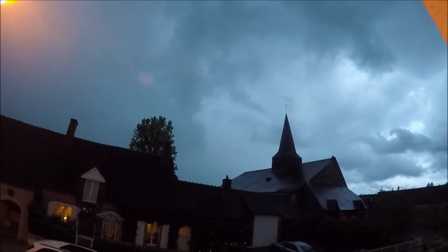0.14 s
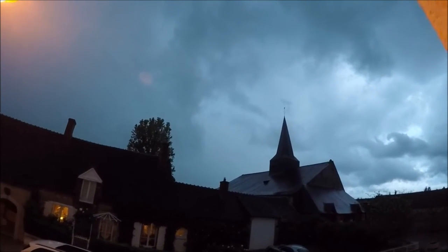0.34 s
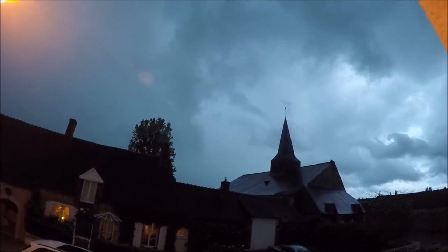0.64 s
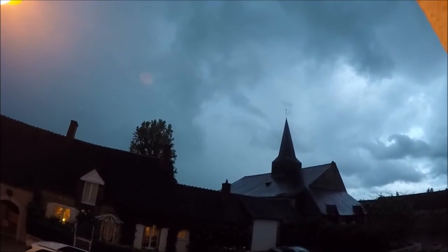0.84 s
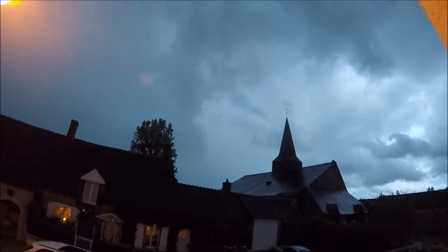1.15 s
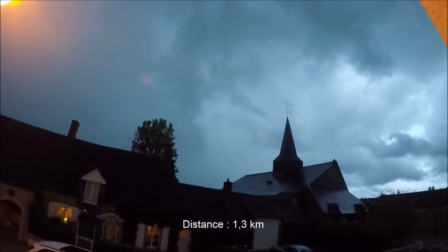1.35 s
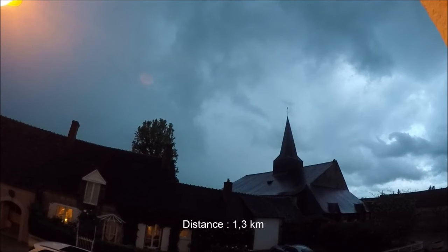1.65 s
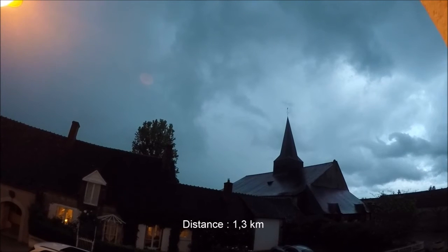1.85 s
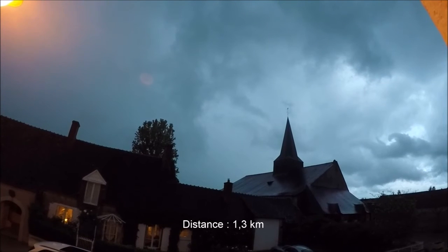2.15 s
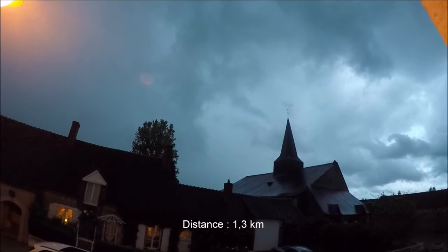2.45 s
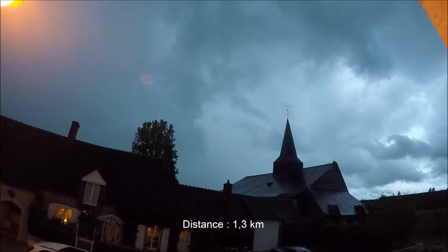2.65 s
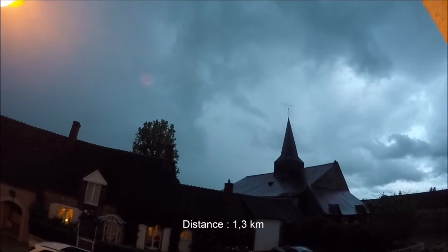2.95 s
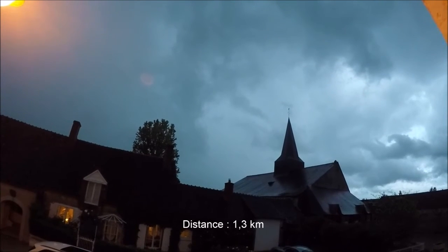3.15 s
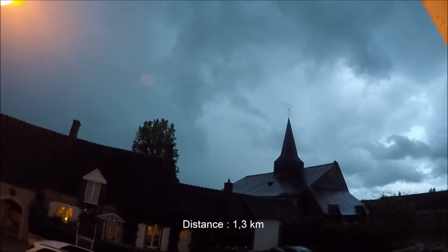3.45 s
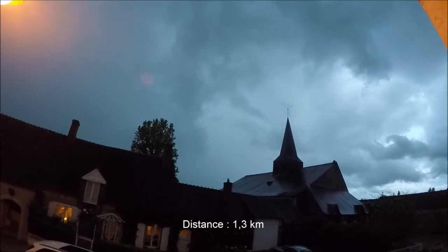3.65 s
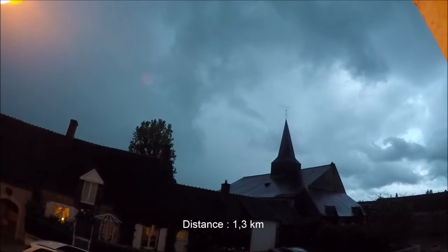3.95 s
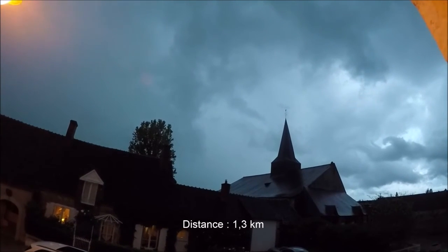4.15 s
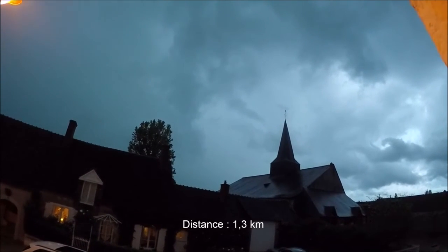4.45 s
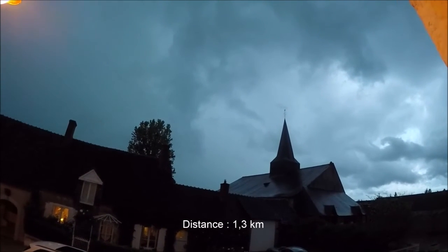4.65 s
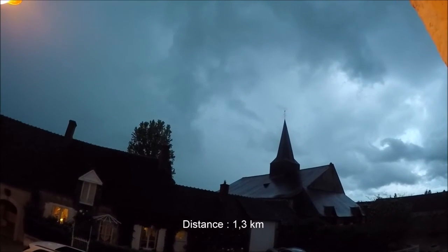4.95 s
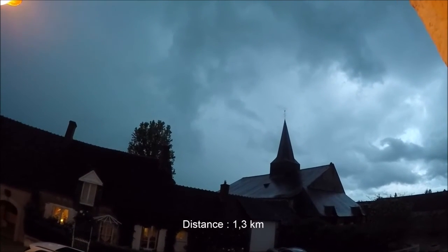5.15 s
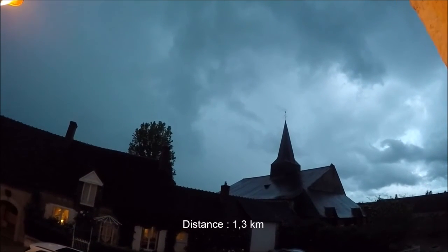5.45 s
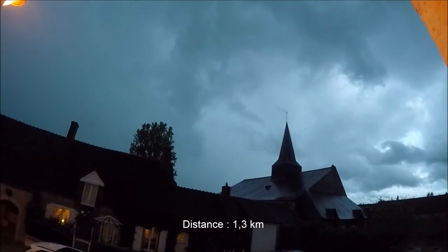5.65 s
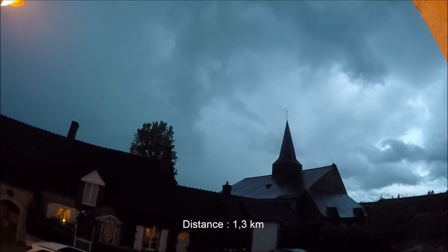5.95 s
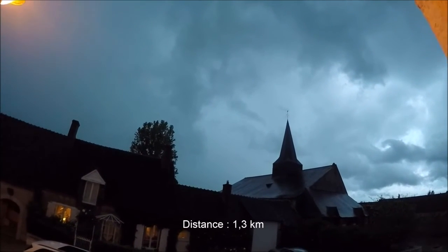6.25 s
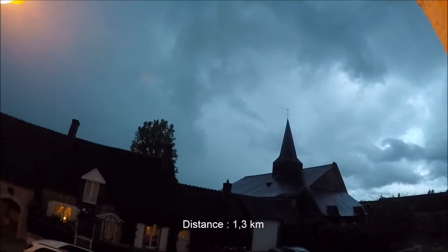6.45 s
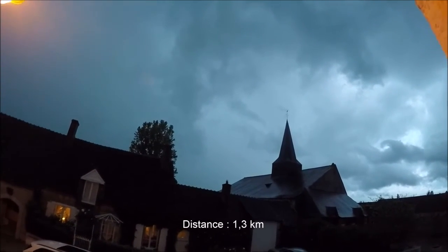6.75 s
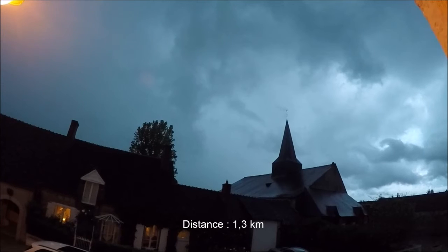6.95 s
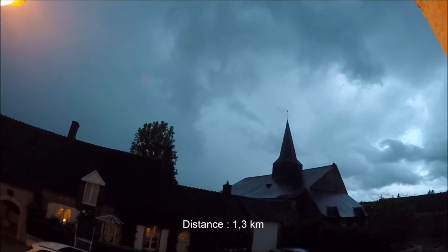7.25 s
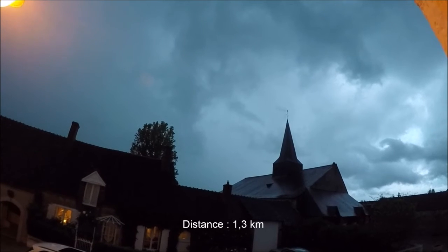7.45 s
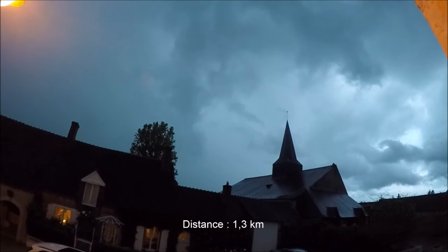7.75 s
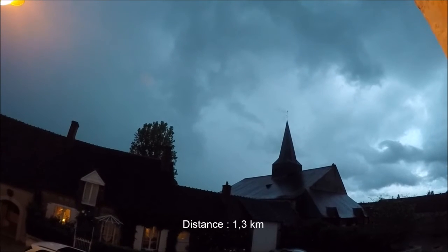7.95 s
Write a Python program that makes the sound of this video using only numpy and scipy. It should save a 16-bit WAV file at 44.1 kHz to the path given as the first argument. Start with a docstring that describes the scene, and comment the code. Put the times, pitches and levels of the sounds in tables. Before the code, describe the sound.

A long, growing roll of close thunder, knocking and rumbling off house walls, peaks late in heavy low booms while a few raindrops tick.

```python
"""Thunder from a long lightning channel rolls over a village square, loudest in its booms and thuds.
The roll is made of thousands of shock fronts at random times, echoed by house walls.
Claps are sudden puffs of noise; thuds are short, low swings of pressure.
First raindrops tick nearby as small puffs of bright noise, with a patter of tiny splashes.
Filtered noise gives the steady hiss of the microphone."""
import sys
import numpy as np
from scipy import signal
from scipy.fft import rfft, irfft, next_fast_len
from scipy.io import wavfile
from scipy.ndimage import uniform_filter1d

SR = 44100
rng = np.random.default_rng(int(sys.argv[2]) if len(sys.argv) > 2 else 0)


def bounce(signal):
    """Save signal as a 16-bit WAV file at the path given by the first command-line argument."""
    frames = np.transpose(np.atleast_2d(signal))
    limited = np.clip(frames, -1, 1)
    pcm = np.round(limited * 32767).astype(np.int16)
    wavfile.write(sys.argv[1], SR, pcm)


def volts_from_decibels(level):
    """Turn decibel levels (scalar or array-like) into linear amplitude factors."""
    exponent = np.asarray(level, float) / 20
    return 10 ** exponent


N = 357210  # length of the scene in samples


def evened(x):
    """Scales a sound to an average strength (rms) of 1."""
    return x / np.sqrt(np.mean(x ** 2) + 1e-20)


def coloured(x, points):
    """Filters a sound by a curve of (f/Hz, level/dB), joined by lines on a log-frequency axis."""
    size = next_fast_len(len(x))
    f, db = np.transpose(points)
    hz = np.fft.rfftfreq(size, 1 / SR)
    gain = volts_from_decibels(np.interp(np.log(hz + 1), np.log(f + 1), db))
    return irfft(rfft(x, size) * gain, size)[:len(x)]


def band(x, low_hz, high_hz, order=3):
    """Lets through only the range from low_hz to high_hz, without looking ahead in time."""
    edges = [low_hz, min(high_hz, SR * .45)]
    return signal.sosfilt(signal.butter(order, edges, "band", fs=SR, output="sos"), x)


def add(mix, s, sound):
    """Mixes a sound in at time s, in seconds."""
    part = mix[round(s * SR):][:len(sound)]
    part += sound[:len(part)]


def burst(db, hz, t60, octaves, rise):
    """A puff of noise around hz that rises fast and dies away, 60 dB in t60 s, scaled to its peak."""
    t = np.arange(SR // 2) / SR
    shape = (1 - np.exp(-t / rise)) * volts_from_decibels(-60 * t / max(t60, .01))
    noise = shape * rng.standard_normal(len(t))
    puff = band(noise, hz / 2 ** octaves, hz * 2 ** octaves, order=4)
    return volts_from_decibels(db) * puff / abs(puff).max()


def walls(x, t60=0.36, wet_db=-3, count=16):
    """Sounds come from one of several directions, each with its own sparse echoes off the houses."""
    way = rng.integers(0, count, N)  # a random direction for every sample
    at = np.arange(200, SR // 2 - 20, 20)
    wet = np.zeros(N)
    for k in range(count):
        echoes = np.zeros(SR // 2)
        sign = rng.choice([-1., 1.], len(at))
        echoes[at + rng.integers(0, 20, len(at))] = sign * volts_from_decibels(-60 * at / SR / t60)
        wet += signal.oaconvolve(x * (way == k), echoes / np.linalg.norm(echoes))[:N]
    return x + volts_from_decibels(wet_db) * wet


def steadied(x, span_s):
    """Divides out level changes slower than about span_s, so that a later curve sets the swell."""
    size = max(round(span_s * SR), 1)
    power = uniform_filter1d(uniform_filter1d(x ** 2, size), size)
    return x / np.sqrt(power + 1e-4)


# Colour after the air and the ground echo, from near stretches of channel:
# (f/Hz, relative level per Hz/dB)
NEAR_COLOUR = [(11, -26.5), (18, -6.5), (53, -2.5), (106, -4), (170, -10.5), (208, -8), (282, -7),
               (315, -4), (426, -16), (475, -8.5), (518, -19), (620, -25.5), (717, -28.5), (782, -31),
               (1500, -39), (1930, -41.5), (2200, -50), (3200, -60.5), (4160, -89), (7040, -120)]
# The same from far stretches: (f/Hz, relative level per Hz/dB)
FAR_COLOUR = [(11, -35.5), (18, -7), (59, 0.5), (151, -5), (185, -9.5), (227, -6), (276, -14), (329, -11),
              (465, -19), (603, -25), (872, -37.5), (1370, -43), (1900, -58), (2260, -71), (3200, -61.5),
              (4160, -75), (7040, -120)]
# How the thunder moves away: (t/s, weight of the far colour from 0 to 1)
MOVING_AWAY = [(3.3, 0.18), (5.0, 0.8)]


def through_air(fronts):
    """Air and ground echo colour the fronts; the mix slides from the near colour to the far one."""
    far = np.clip(np.interp(np.arange(N) / SR, *np.transpose(MOVING_AWAY)), 0, 1)
    near_sound = evened(coloured(fronts, NEAR_COLOUR))
    far_sound = evened(coloured(fronts, FAR_COLOUR))
    return (1 - far) * near_sound + far * far_sound


def bunched(rows, t, hz):
    """Sums smooth humps in dB; each fades with distance in time and in pitch from its centre."""
    reach_octaves = 1.25
    total = 0
    for s, db, mid_hz, length in rows:
        off_pitch = np.log2(hz / mid_hz) / reach_octaves
        off_time = 2 * (t - s) / length
        total = total + db * np.exp(-off_pitch ** 2 - off_time ** 2)
    return total


# Booms and crackles, where fronts of about one pitch grow louder (softer if negative):
# (t/s, level over the roll/dB, centre f/Hz, length t/s)
LOUDER_MOMENTS = [(.735, 5.5, 450, 0.065), (.75, 2, 100, .06), (.91, 8, 1500, 0.25),
                  (0.918, 11.5, 170, 0.089), (1.2, 3.5, 1500, 0.1), (1.225, 4, 1800, 0.027),
                  (1.206, 7.5, 196, 0.084), (1.35, 4, 1500, 0.038), (1.36, 3.5, 250, 0.093),
                  (1.44, 9, 500, 0.022), (1.872, 3.5, 1000, 0.05), (2.24, 5, 1270, 0.087),
                  (2.25, 3, 50, 0.12), (2.37, 7, 700, 0.07), (2.36, 3, 70, .06), (2.495, 10, 576, 0.079),
                  (2.565, 11.5, 65.4, 0.028), (2.735, 2, 91, 0.1), (2.75, 5, 300, 0.039),
                  (2.79, 1.5, 1700, 0.037), (2.82, 6, 1310, 0.32), (2.83, 1, 800, 0.098),
                  (2.96, 1.5, 1500, .06), (3.08, 2, 1400, 0.036), (3.14, 5, 1500, 0.09),
                  (3.206, 10.5, 100, 0.079), (3.32, 8, 55, 0.053), (3.31, 2.5, 1800, .04),
                  (3.344, 4.5, 700, 0.073), (3.43, 3.5, 300, 0.047), (3.695, 15.5, 60, 0.017),
                  (3.876, 5, 1300, 0.054), (4.23, 4, 130, 0.032), (4.245, 5.5, 1500, 0.052),
                  (4.412, 8.5, 55, 0.075), (4.643, 7, 71, 0.24), (5.22, 4, 302, 0.043),
                  (5.37, 1.5, 189, 0.04), (5.5, 4.5, 80, 0.097), (5.52, -0.5, 220, 0.047),
                  (5.43, 3.5, 550, 0.35), (5.56, 1.5, 910, 0.05), (6.052, 11.5, 79.4, 0.054),
                  (6.2, 3.5, 50.6, 0.12), (6.401, 6.5, 298, 0.033), (6.6, -2, 60, 0.054),
                  (6.59, 5, 463, 0.052), (6.775, 5.5, 149, 0.065), (6.65, 1, 160, 0.051),
                  (6.765, 4, 600, 0.1), (6.75, 2.5, 1400, 0.079), (6.86, 2.5, 300, 0.23),
                  (6.58, 0.5, 787, .06), (7.53, -0.5, 800, 0.065), (7.71, 1, 696, 0.068),
                  (5.36, 2, 750, 0.039), (7.045, 4, 130, 0.038), (7.394, 7.5, 151, 0.062),
                  (7.535, 8, 452, 0.095), (7.545, 2, 190, 0.053), (7.7, 3, 250, 0.17), (8.08, 5, 90, 0.066)]


def booms(t, hz):
    """Rise in dB where fronts sounding around hz swell into booms and crackles."""
    return bunched(LOUDER_MOMENTS, t, hz)


# Lulls, where fronts of about one pitch grow softer (louder if negative):
# (t/s, level under the roll/dB, centre f/Hz, length t/s)
SOFTER_MOMENTS = [(.81, 10, 200, 0.037), (1.04, 3, 60, 0.1), (1.038, 3, 330, 0.048), (1.147, 2, 600, .03),
                  (1.1, -2, 1200, .1), (1.29, 5.5, 250, 0.055), (1.29, 4, 1200, .05), (1.67, 9, 151, 0.035),
                  (1.76, 2, 100, 0.024), (2.19, 12, 80, 0.021), (2.32, 34, 90.5, 0.018),
                  (2.6, 0, 506, 0.064), (2.724, 1, 600, .025), (3.063, 2, 60, .05), (3.427, 3, 60, .05),
                  (3.46, 6, 200, 0.068), (3.52, 1.5, 506, 0.083), (3.76, 8, 117, 0.078),
                  (3.941, 2, 150, .035), (3.96, 0.5, 1400, .1), (4.29, 5, 70, .05), (4.49, 8, 55.5, 0.042),
                  (4.535, 7, 55, .04), (4.755, 3, 400, 0.025), (5.07, 13.5, 200, 0.018),
                  (5.98, 3, 70, 0.075), (2.62, 1.5, 1500, .08), (3.03, -1, 1300, 0.035),
                  (3.22, -1, 1500, 0.053), (6.35, 5.5, 250, 0.036), (6.71, -1, 81, 0.021),
                  (6.824, 10, 160, 0.027), (6.87, 5, 50, 0.044), (6.985, 19, 101, 0.018),
                  (7.194, -2.5, 600, .03), (7.298, 1.5, 320, .03), (7.548, 12, 55, 0.05),
                  (7.78, 17, 89, 0.031), (8.03, 6.5, 150, 0.084)]


def lulls(t, hz):
    """Drop in dB for fronts around hz, in the lulls and around each thud of similar pitch."""
    dip_db, dip_span = 3, 0.93  # dip at a thud, and its length as a share of the thud's length
    dips = [(s, dip_db, thud_hz, dip_span * cycles / thud_hz) for s, _, thud_hz, cycles in THUD_LIST]
    return bunched(SOFTER_MOMENTS + dips, t, hz)


# The five sizes of front: (low f/Hz, high f/Hz, arrivals per s, scale of random level/dB)
FRONT_SIZES = [(32.8, 74.5, 470, -0.5), (85.8, 177, 550, 1.5), (197.7, 433, 900, 1.5),
               (412, 799, 1500, 1.5), (790, 2770, 1000, 1.5)]
# The swell of this strike: (t/s, level/dB before each size's offset, brightness/dB, depth/dB)
STRIKE = [(0.704, -46.5, 4, 1), (1.05, -46, -5, -2), (1.3, -42, 2, -0.5), (1.6, -34, -2, -3),
          (2.0, -32, 0.5, -1), (2.4, -32, 5, 2), (2.8, -28.5, -1, 1), (3.05, -29.5, 1.5, 3),
          (3.4, -29.5, -0.5, -3), (3.8, -32, -1.5, 1.4), (4.1, -33, -3, 0.3), (4.6, -32, -3, -1.5),
          (5.05, -32, -3.5, 1), (5.4, -27.5, -6.5, 2.5), (5.75, -29.5, -5, 0), (6.2, -31, -2, 1),
          (6.65, -24, -7.5, 4), (6.95, -27.5, -10, 3.5), (7.281, -31.5, -4, 0.5), (7.6, -25.5, -10.5, -1),
          (7.849, -27, -8, -0.5), (8.1, -28.5, -16.5, 1.5)]
# How each size of front follows the strike:
# (offset level/dB, share of brightness, share of depth, far rumble level at the start/dB)
SIZE_FOLLOWS = [(1, 0.013, 0.87, -45), (1, -0.33, 0.12, -50.5), (-1.5, 0.15, -0.66, -57),
                (-9, 0.16, 0.3, -63.5), (-22.5, 0.69, -0.15, -75)]


def roll():
    """Shock fronts of five sizes arrive at random and follow one swell, over a fading far rumble."""
    rumble_fade_db_per_s = 6
    s, level_db, bright_db, deep_db = np.transpose(STRIKE)
    t, out = np.arange(N) / SR, np.zeros(N)
    steps = t[::64]  # loudness is worked out every 64 samples
    for follow, front in zip(SIZE_FOLLOWS, FRONT_SIZES):
        over_db, bright, deep, rumble_db = follow
        low, high, rate, spread_db = front
        size = volts_from_decibels(spread_db * np.minimum(rng.exponential(1, N), 5)) * rng.choice([-1., 1.], N)
        arrives = rng.random(N) < rate / SR
        fronts = band(walls(size * arrives), low, high)
        heard = steadied(through_air(fronts), span_s=0.055 + 2.0 / low)
        hz = np.sqrt(low * high)
        swell_db = np.interp(steps, s, level_db + over_db + bright * bright_db + deep * deep_db)
        strike = volts_from_decibels(swell_db + booms(steps, hz) - lulls(steps, hz)) * (steps > s[0])
        rumble = volts_from_decibels(rumble_db - rumble_fade_db_per_s * steps)
        out += np.interp(t, steps, np.hypot(strike, rumble)) * heard
    return out


# Colour of the hiss: (f/Hz, relative level per Hz/dB)
HISS_COLOUR = [(410, -31.5), (700, 1.5), (1010, -1), (2020, 1.5), (2220, 1), (3440, -2.5), (3720, -2.5),
               (4940, -3), (8620, -9), (14300, -12), (15400, -19)]


def hiss():
    """Steady self-noise of the microphone: random noise, filtered to its colour."""
    return volts_from_decibels(-67.5) * evened(coloured(rng.standard_normal(N), HISS_COLOUR))


# Raindrops landing close by:
# (t/s, peak level before echoes/dB, centre f/Hz, time to fall 60 dB t/s, reach in octaves)
DROP_LIST = [(.249, -57, 3250, 0.055, 0.31), (0.323, -54.5, 3870, 0.039, .4),
             (.571, -58.5, 5780, 0.086, 0.27), (0.936, -52, 5770, 0.05, 0.23), (.936, -55.5, 3200, .06, .2),
             (.947, -56.5, 5600, .06, .2), (1.944, -58, 2610, 0.043, 0.27), (4.627, -53, 3320, 0.031, 0.5),
             (4.68, -61, 2310, 0.06, 0.19), (4.875, -66, 4600, 0.034, .15), (4.951, -51, 4300, 0.035, 0.5),
             (5.015, -62.5, 4900, .03, 0.17), (5.204, -56, 3410, 0.028, 0.6),
             (5.879, -53.5, 2540, 0.034, 0.36), (6.558, -57, 4540, 0.026, 0.31),
             (6.713, -51.5, 4180, .025, 0.88), (6.714, -55.5, 6540, 0.063, 0.17),
             (6.742, -62, 6420, .05, .1), (6.746, -56, 3700, .07, .5), (6.789, -59.5, 4490, 0.064, 0.084),
             (6.778, -61.5, 6340, 0.037, .15), (6.812, -60.5, 3400, 0.066, 0.57),
             (6.835, -60.5, 3600, 0.052, .6), (7.848, -53.5, 3170, .035, 0.36)]


def drops():
    """Short bright ticks of water on tile and stone, and a thin random patter of one tiny splash."""
    spray_db, spray_s = 2.5, .09  # the patter grows louder after each close drop, then settles
    out = np.zeros(N)
    for s, db, hz, t60, octaves in DROP_LIST:
        add(out, s, burst(db, hz, t60, octaves, rise=0.0011))
    out = walls(out, t60=.2, wet_db=-10.5)
    landed = np.bincount([round(row[0] * SR) for row in DROP_LIST], minlength=N)
    spray = np.minimum(signal.lfilter([1], [1, -np.exp(-1 / (spray_s * SR))], landed), 1)
    size_db = spray_db * spray + 3.0 * np.minimum(rng.exponential(1, N), 3)
    patter = volts_from_decibels(size_db) * (rng.random(N) < 150 / SR)  # about 150 splashes per s
    splash = rng.standard_normal(900) * volts_from_decibels(-60 * np.arange(900) / SR / 0.093)
    splashes = band(signal.oaconvolve(patter, splash)[:N], 2300, 5000, order=3)
    return out + volts_from_decibels(-77.5) * evened(splashes)


# Single claps: (t/s, peak level/dB, centre f/Hz, time to fall 60 dB t/s)
CLAP_LIST = [(.712, -36, 370, 0.079), (.882, -38, 323, 0.079), (1.161, -42.5, 400, 0.33),
             (1.333, -36, 358, 0.098), (1.43, -45, 414, 0.051), (1.59, -40, 327, 0.063),
             (1.85, -37, 413, 0.05), (2.01, -31.5, 486, 0.077), (2.142, -29.5, 397, 0.092),
             (2.47, -29.5, 387, 0.071), (2.55, -31.5, 386, 0.085), (2.823, -17.5, 317, 0.32),
             (3.136, -24, 327, 0.23), (3.28, -36, 350, 0.094), (5.215, -29, 270, .1),
             (5.345, -28, 247, 0.091), (5.55, -33, 533, 0.092), (5.735, -39, 480, .05),
             (6.174, -38, 480, 0.044), (6.27, -35, 395, 0.076), (6.564, -23, 300, 0.12),
             (6.73, -14, 253, 0.14), (6.752, -21.5, 350, 0.25), (7.33, -37, 447, 0.074),
             (7.705, -31, 430, 0.21), (7.95, -37, 454, 0.056)]


def claps():
    """Stretches of channel that face the listener arrive all at once, each as a puff of noise."""
    out = np.zeros(N)
    for s, db, hz, t60 in CLAP_LIST:
        add(out, s, burst(db, hz, t60, octaves=0.76, rise=0.0011))
    return out


# Thuds and knocks, each one big front and its swing back:
# (centre t/s, height of the window as level/dB, f/Hz, cycles)
THUD_LIST = [(.72, -33, 397, 3.5), (.853, -29.5, 139, 2.4), (.938, -35, 95.5, 2.9),
             (1.087, -30.5, 140, 2.4), (1.138, -29.5, 125, 4), (1.181, -28, 110, 2.65),
             (1.21, -30.5, 330, 5), (1.225, -29, 100, 2.55), (1.356, -25, 90, 2.5), (1.431, -28, 338, 5.6),
             (1.517, -32, 480, 6), (1.545, -27, 60, 2.5), (1.6, -21.5, 134, 2.7), (1.718, -18.5, 129, 3.1),
             (1.785, -23, 130, 2.4), (1.811, -18, 124, 2.8), (2.045, -24, 60.4, 3.5),
             (2.155, -21, 337, 5.7), (2.289, -24, 477, 7), (2.754, -16.5, 150, 3.4),
             (2.832, -25.5, 600, 5.9), (2.834, -15.5, 150, 3.1), (2.71, -16, 65, 2.1),
             (2.84, -13, 76.4, 1.9), (2.88, -12, 70, 1.66), (3.188, -20, 101, 2.85), (3.242, -20.5, 300, 5),
             (3.284, -17.5, 70, 2.8), (3.337, -22.5, 486, 8), (3.515, -15.5, 104, 2.8),
             (3.572, -32, 496, 6), (3.602, -13, 62, 2.7), (3.632, -19, 150, 2.85), (4.23, -29, 495, 6.5),
             (4.689, -30, 500, 5.3), (4.838, -16, 58, 2.2), (4.941, -28.5, 500, 6), (5.222, -22.5, 253, 6),
             (5.265, -14.5, 75, 1.8), (5.353, -10, 73, 1.7), (5.372, -12.5, 188, 3),
             (5.413, -13.5, 61.7, 2.9), (5.531, -16, 111, 3.05), (5.587, -19.5, 258, 5.1),
             (6.006, -29.5, 507, 5.6), (6.566, -9.5, 91, 2.53), (6.571, -11.5, 188, 2.76),
             (6.605, -14, 70, 2.4), (6.647, -13.5, 150, 3.5), (6.735, -9, 168, 2.03),
             (6.744, -5.5, 84, 3.64), (6.763, -10.5, 320, 5.2), (6.766, -13, 140, 3.24),
             (6.784, -17, 353, 9.9), (6.855, -14, 110, 2), (6.922, -13, 64.4, 2.6), (7.5, -13, 66, 2.9),
             (7.545, -13.5, 184, 4.3), (7.56, -12, 145, 3.5), (7.609, -11.5, 62.4, 3.55),
             (7.681, -8.5, 105, 2.22), (7.728, -10, 75, 2.45)]


def thuds():
    """A few swings of pressure, as sine cycles under a smooth window centred on their time."""
    out = np.zeros(N)
    for (s, db, hz, cycles), turn in zip(THUD_LIST, rng.random((len(THUD_LIST), 1))):
        t = np.arange(0, cycles / hz, 1 / SR)
        swing = np.sin(2 * np.pi * (hz * t + turn))  # turn: random starting point in the cycle
        add(out, s - t[-1] / 2, volts_from_decibels(db) * np.hanning(len(t)) * swing)
    return out


def scene():
    """Thunder and raindrops, in one channel."""
    return (roll() + claps() + thuds() + drops())[None]


def top_cut(x):
    """Nothing passes above the cut-off."""
    return signal.sosfilt(signal.butter(12, 15590, fs=SR, output="sos"), x)


def record(dry):
    """Adds the microphone hiss and a fade of 6 ms at both ends."""
    fade = signal.windows.tukey(N, .012 * SR / N)  # both fades together last .012 s
    return top_cut((dry + hiss()) * fade)


dry = scene()
out = record(dry)
bounce(out)
```